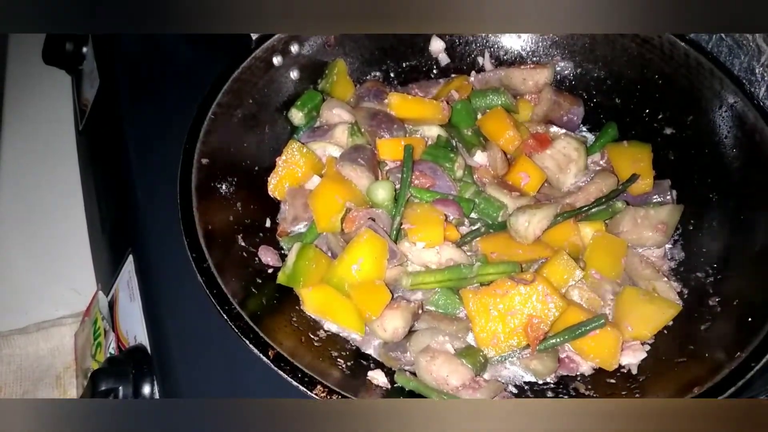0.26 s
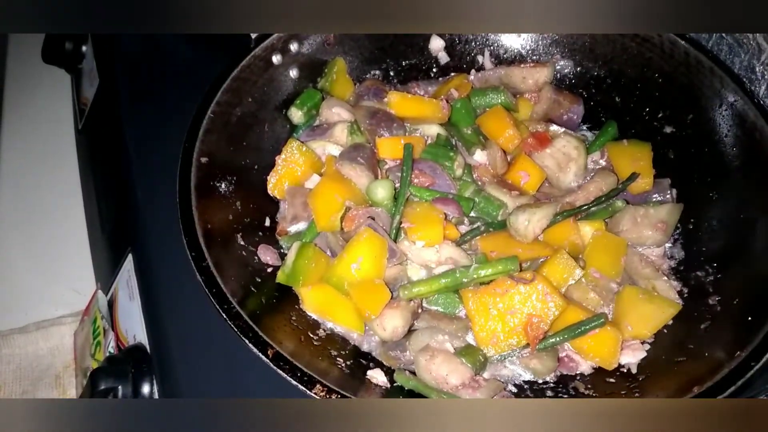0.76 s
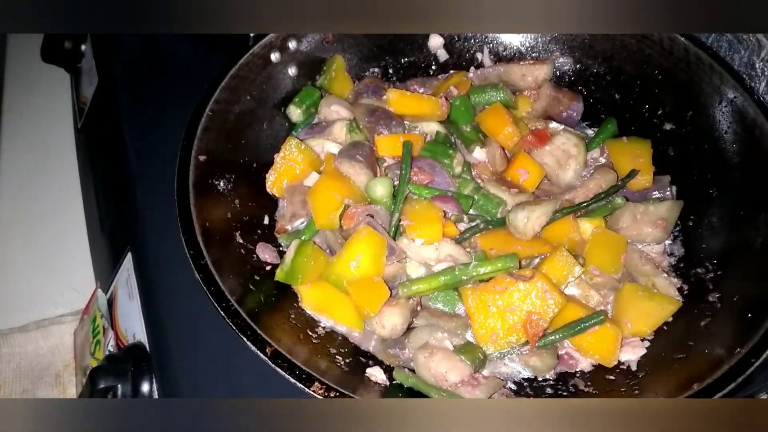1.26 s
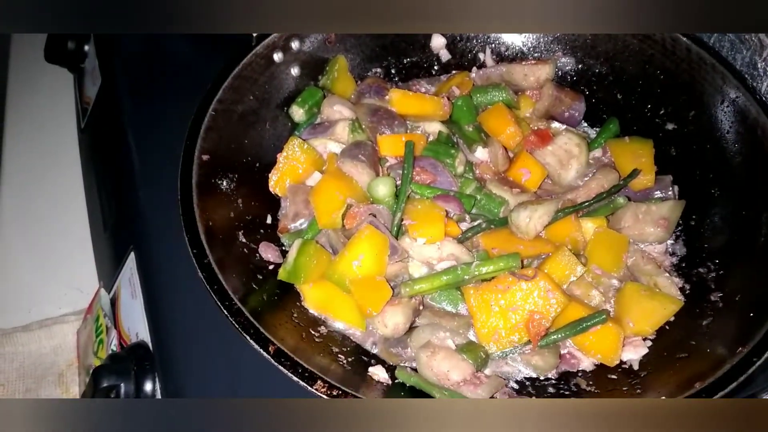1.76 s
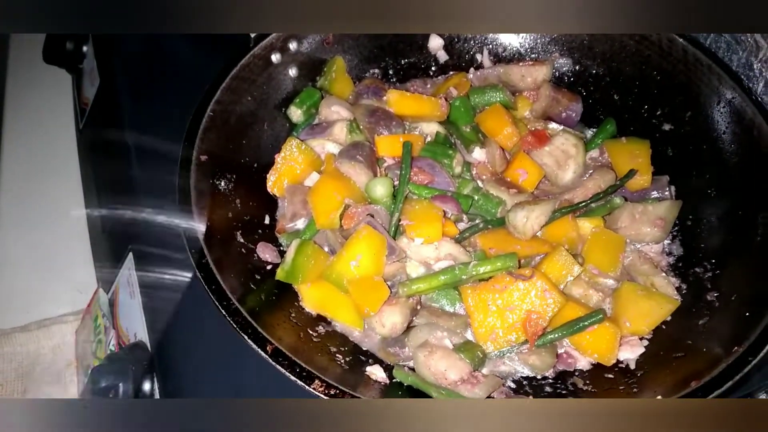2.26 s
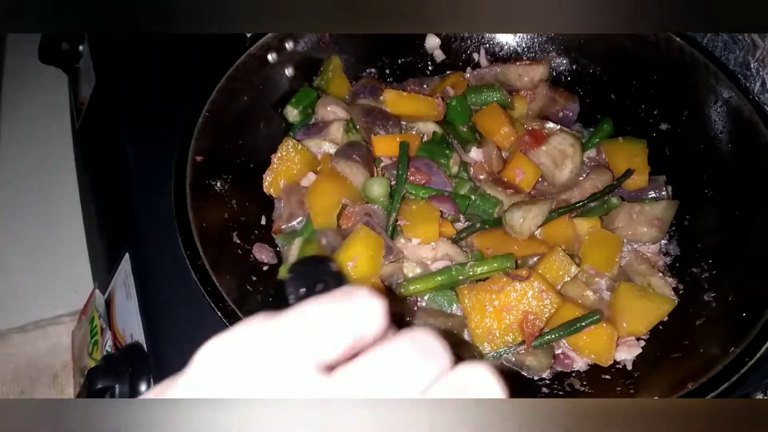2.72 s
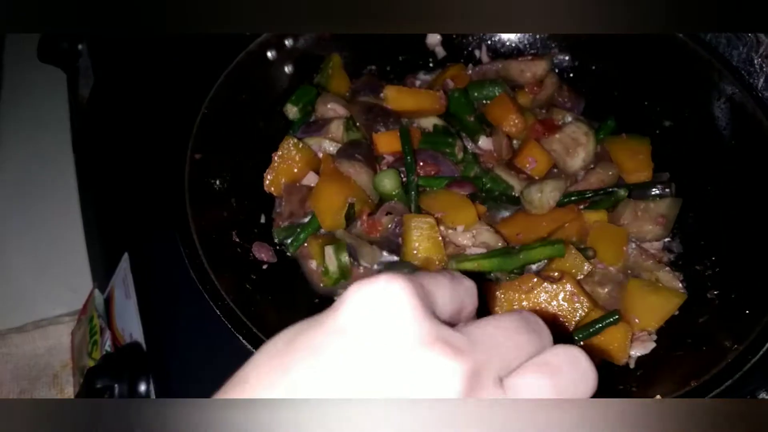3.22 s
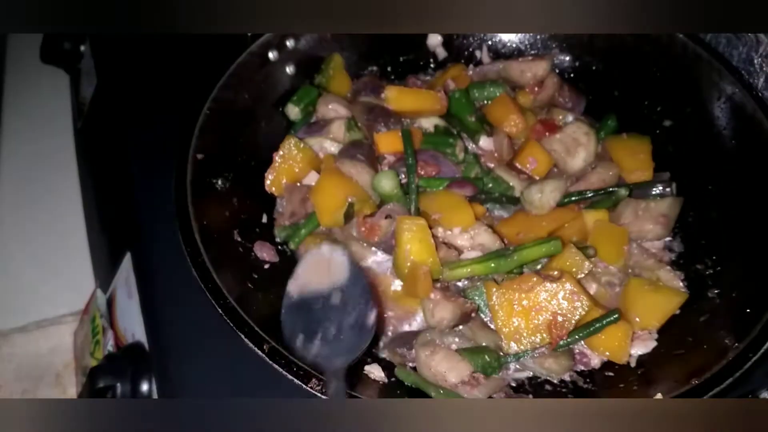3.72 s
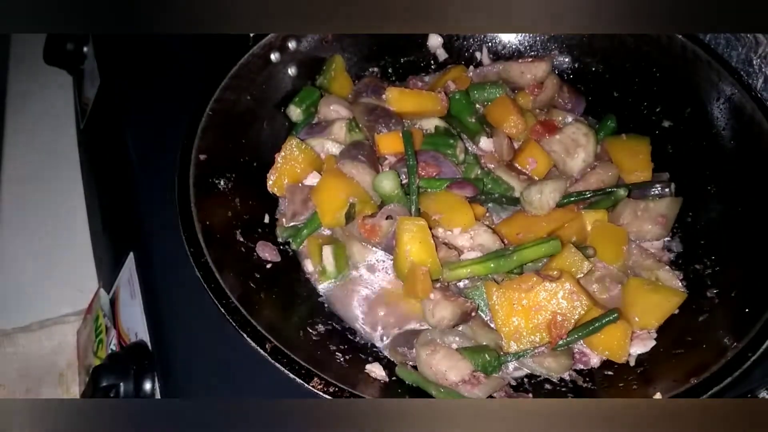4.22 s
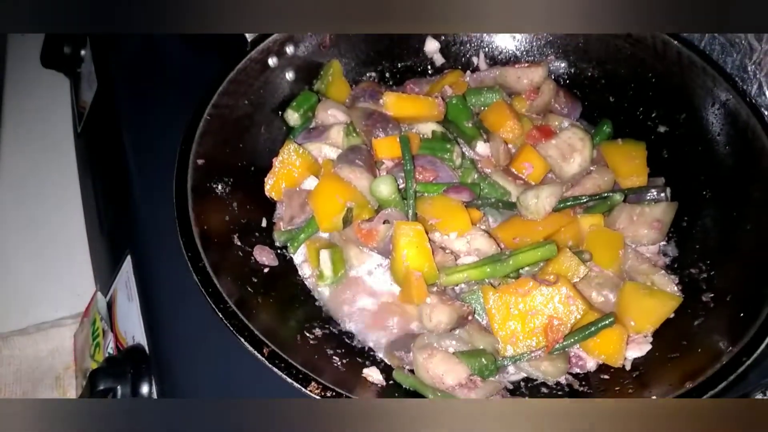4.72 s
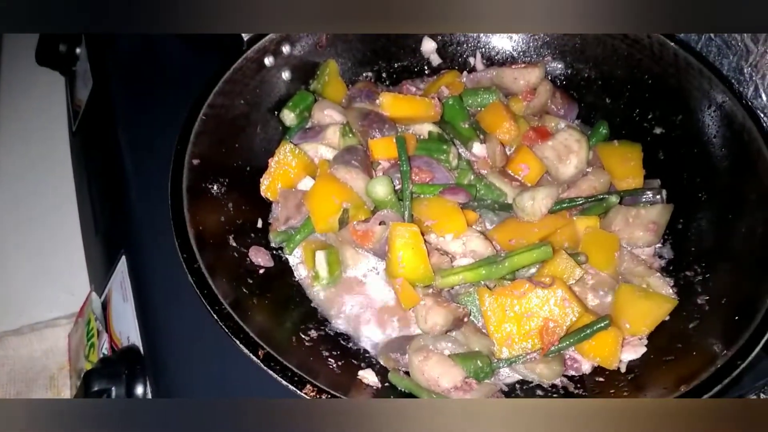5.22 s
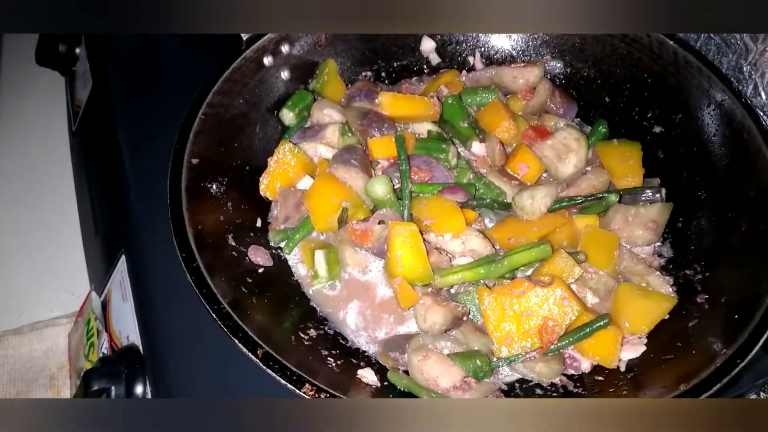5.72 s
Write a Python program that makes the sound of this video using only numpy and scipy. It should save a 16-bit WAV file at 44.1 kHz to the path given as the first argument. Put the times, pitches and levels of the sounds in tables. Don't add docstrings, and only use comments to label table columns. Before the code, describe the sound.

Vegetables fizz and sizzle steadily in a wok while a spoon clacks sharply once midway and smaller kitchenware knocks dot a small kitchen.

```python
import sys
import numpy as np
from scipy import signal
from scipy.fft import rfft, irfft, next_fast_len
from scipy.io import wavfile
from scipy.ndimage import uniform_filter1d

SR = 44100
rng = np.random.default_rng(int(sys.argv[2]) if len(sys.argv) > 2 else 0)


def attenuation_scalar(level_db):
    decades = np.asarray(level_db, float) / 20
    return 10 ** decades


def log_audio(samples):
    frames = np.atleast_2d(samples).T
    limited = np.clip(frames, -1, 1)
    pcm = np.round(limited * 32767).astype(np.int16)
    wavfile.write(sys.argv[1], SR, pcm)


N = 263625

# (time [s], level [dB])
BOIL = [(0.0, -54), (0.46, -54.5), (0.68, -52), (0.83, -57.5), (1.05, -51.5), (1.2, -53.5), (2.21, -53.5),
        (2.66, -52), (2.86, -54.5), (3.38, -54.5), (4.0, -54), (4.32, -53.5), (4.93, -53.5), (5.31, -49.5),
        (5.52, -54), (5.8, -52.5), (5.88, -50.5), (5.98, -54.5)]
# (time [s], peak [dB], left minus right [dB], pitch [Hz])
SPITS = [(0.032, -37.5, 1, 6390), (0.0824, -34, 4, 10100), (1.017, -33, 0, 10800), (1.077, -36, -3, 11500),
         (1.4355, -38, -7, 7720), (1.501, -33, -1, 9630), (1.715, -33, -1, 6660),
         (2.0157, -36.5, -5, 11100), (2.108, -33, -6.5, 9430), (2.212, -35, 5, 9590),
         (2.217, -27.5, 0, 9550), (2.2319, -33, -1, 10600), (2.2512, -37, -5, 10900),
         (2.373, -34, -4, 10600), (2.5284, -40, 3, 10300), (2.6975, -34, -4, 10300),
         (2.7206, -35, -5.5, 10200), (3.0085, -39, 1, 7590), (3.1265, -31.5, 1, 10900),
         (3.4796, -38, -4, 10700), (3.6754, -38, 0, 6610), (3.7314, -39, 4, 7050),
         (4.1159, -35.5, -1, 7530), (4.6432, -34, -5, 7390), (4.8518, -31, -2, 7800),
         (4.954, -32, -3, 6870), (5.1497, -39, 1, 6660), (5.172, -37, 3, 7070), (5.222, -37, 0, 11000),
         (5.255, -34, -4, 6760), (.144, -35, -1, 10800), (.549, -33, 0, 11000), (.62, -40, 0, 10100),
         (1.3912, -38, -1, 6960), (1.668, -39, 0, 6930), (1.787, -32, -4, 10500), (2.2972, -39, -3, 7230),
         (2.642, -39.5, -4, 10300), (2.6854, -41, -4, 11500), (2.7657, -37, 0, 10700),
         (2.8485, -41, -2, 11070), (3.1333, -37.5, -2, 7280), (3.2585, -38, 0, 10500),
         (3.3378, -38, 0, 10540), (4.0056, -37, -1, 7160), (4.368, -38, -2, 10000), (4.998, -38, -1, 7420),
         (5.074, -35, 0, 7740), (5.1966, -36, 0, 10800), (5.4116, -40, 0, 6760)]
# (time [s], level [dB], left minus right [dB], contact [ms], rattle T60 [ms])
KNOCKS = [(0.47, -46.5, 1, 60, 99), (0.6495, -30, 2, 3.7, 125), (0.7363, -46, 3, .8, 40),
          (0.7765, -36, 2, 4.2, 140), (1.865, -48, 2, 21, 95), (2.4508, -30, -1, 3, 36),
          (2.4549, -18, 1.5, 1.5, 22), (2.4604, -32.5, -2, 3.4, 50), (2.7791, -38, 3, 0.93, 120),
          (3.611, -31, 0, 4.8, 35), (4.5516, -42, 3, 1.5, 110), (5.1745, -45.5, 3, 2, 36),
          (5.405, -45, 1.5, 8.9, 83), (5.7196, -40, 1.5, 2.8, 49), (5.7652, -34.5, 7.5, .4, 16),
          (2.4559, -15, -9, 0.66, 7.6), (2.218, -42.5, 1, 0.82, 13), (5.42, -49, 0, 3, 56),
          (5.865, -51.5, 2, 4, 90), (4.56, -54, 1, 9, 120), (2.465, -46, 0, 4.2, 220),
          (2.8, -50.5, 2, 50, 90), (.549, -45, 0, 1, 60)]
# (time [s], frequency [Hz], level [dB], T60 [s], left minus right [dB])
METAL_RINGS = [(2.4548, 2880, -36.5, 0.14, 11), (2.4553, 4500, -48, 0.06, 7), (2.4553, 5930, -44, 0.17, 4),
               (2.4553, 4600, -48, .2, 4), (2.4553, 4600, -46, .15, 4), (2.4553, 7410, -53, .16, 7),
               (2.456, 9470, -44, .06, 0), (2.456, 8880, -50, .1, 0), (2.456, 14780, -56, .25, -5),
               (2.683, 13000, -52, .12, -5), (2.4553, 4200, -44, .09, 3), (2.4548, 7520, -50, 0.1, 7),
               (2.456, 10330, -41, 0.089, 0), (2.456, 13750, -54, .45, -5), (.778, 7450, -49.5, 0.12, 7),
               (.778, 10330, -50, .17, -3), (.778, 13700, -54, .15, -4), (0.777, 1620, -42.5, 0.11, 5),
               (3.613, 7200, -55, 0.055, -2),
               (.651, 945, -45, .08, 2), (.651, 1454, -46, .13, 2), (.651, 1710, -45, .11, 2),
              (.651, 2440, -50, .11, 2), (.651, 2830, -47, .09, 2), (.651, 3630, -44, .1, 2),
              (.651, 4300, -47, .08, 2), (.651, 6090, -51, .1, 2), (.778, 890, -49, .09, 4),
              (.778, 2170, -49, .11, 2), (0.779, 2524, -50, .14, 2), (.778, 2770, -49, 0.15, 2),
              (.778, 3200, -51, 0.098, 2), (.778, 4190, -48, 0.099, 2), (3.612, 1008, -47.5, 0.14, 0),
              (3.612, 1600, -44, .04, 0), (3.613, 2490, -48, .04, 0), (3.613, 3600, -45.5, .14, 2),
              (3.614, 5840, -49, 0.13, 0), (3.614, 8100, -52, .09, 0)]
# (time [s], firing rate [Hz], level [dB])
ENGINE = [
    (0, 48.7, -60),
    (.46, 45.97, -59),
    (.92, 39.1, -60),
    (1.2, 37.44, -60),
    (1.8, 35, -64),
    (2.5, 33.55, -65),
    (3.1, 36.6, -73),
    (3.7, 36.5, -64),
    (4.3, 35, -76),
    (5.98, 31, -67),
]
# (frequency [Hz], gain [dB])
FIZZ = [(1500, -28), (3000, -6.5), (5000, -4.5), (8000, -4), (11000, -0.5), (14000, 0), (17000, 0)]
# (frequency [Hz], gain [dB])
RUSH = [(600, -14.5), (1500, 0.5), (3000, -2.5), (6000, -8), (12000, -16.5), (17000, -9.5)]
# (frequency [Hz], gain [dB])
BRIGHT = [(1000, -14), (2500, -12), (4000, 0), (5500, 3), (8000, -0.5), (12000, -4.5), (17000, 7.5)]
# (frequency [Hz], gain [dB])
DULL = [(250, -20), (650, 1.5), (1500, 1.5), (2500, -1.5), (4000, -8), (8000, -42)]
# (frequency [Hz], density [dB per Hz])
HOOD = [(30, -9), (70, -1.5), (130, 0), (200, -0.5), (280, -5.5), (420, -5.5), (760, -4.5), (1100, -9),
        (1700, -11), (2500, -22), (3500, -49)]
# (resonance [Hz], width [Hz], gain [dB])
PORTS = [
    (7380, 1170, 0.5),
    (10800, 1950, 0),
]
# (frequency [Hz], density [dB per Hz])
JAR = [(350, -41), (600, -16), (950, -7), (1200, -11), (1620, -2.5), (1910, -10), (2040, -27), (2370, -2),
       (2680, -11.5), (3660, -2), (4620, -11), (5980, -3.5), (9370, -3), (10700, 0), (15500, -13.5)]
# (frequency [Hz], density [dB per Hz])
BOWL = [(350, -38), (600, -10), (902, -10), (1030, -16), (1620, -1.5), (2000, -10), (2570, -7.5),
        (3200, -5), (3470, -29), (4090, -5.5), (5220, -11), (7240, -3.5), (9240, -8), (10700, -0.5),
        (15500, -22)]
# (frequency [Hz], density [dB per Hz])
SPOON_BLOW = [(900, -27.5), (1100, -21), (1850, -21.5), (2050, -10.5), (2500, -12.5), (3300, -12.5),
              (4400, -12), (5200, 2), (6000, -4), (6800, 1), (7700, -0.5), (9300, -7.5), (10600, -4),
              (13000, -14), (16000, -17.5)]
# (frequency [Hz], density [dB per Hz])
WOK = [(410, -77), (700, -53), (980, -5), (1410, -7), (2630, -9.5), (2990, -33), (3580, -3), (3920, -8),
       (4520, -2), (5430, -11), (5860, 1.5), (8880, -9.5), (10600, 0), (15500, -20)]
# (frequency [Hz], density [dB per Hz])
RIM = [(1180, -56), (2000, -27), (4320, -18.5), (5180, -24), (6640, -1.5), (8510, -20), (11200, -14),
       (15500, -30.5)]
# (frequency [Hz], density [dB per Hz])
TIP = [(880, -47), (1500, -22), (1790, -36), (2860, -22), (7230, -4), (9420, -25), (11100, -17),
       (15500, -21.5)]
# (frequency [Hz], density [dB per Hz])
HANDLE = [(700, -30), (1500, -2.5), (3000, -2), (5000, -4), (8000, -12), (15500, -25)]
# (frequency [Hz], density [dB per Hz])
SPOON_TAIL = [(3300, -40), (4100, -22), (4600, -2), (6000, -4), (7500, -2), (10300, -4), (14000, -12),
              (15500, -25)]
# (frequency [Hz], density [dB per Hz])
SCRAPE = [(700, -24), (1200, -12), (2500, -24), (5000, -16), (7400, 0.5), (9000, -10), (10300, -3),
          (15500, -14)]
# (frequency [Hz], density [dB per Hz])
THUD = [(250, -22), (500, 0), (700, 0), (1100, -5), (1800, -4), (2600, -25), (15500, -50)]
BODIES = {2.465: SPOON_TAIL, 2.8: SCRAPE, 2.7791: SCRAPE, .7363: RIM, 4.56: THUD, 5.42: THUD, 5.865: THUD,
          .6508: JAR, .7775: BOWL, 2.4553: SPOON_BLOW, 3.6115: WOK, 5.1745: HANDLE, 5.7205: RIM, 5.7652:
          TIP}

USUAL_BOIL_DB = -51.5


def level(x, db):
    return x * attenuation_scalar(db) / np.sqrt(np.mean(x ** 2))


def colour(x, points):
    hz, db = np.transpose(points)
    size = next_fast_len(x.shape[-1])
    f = np.maximum(np.fft.rfftfreq(size, 1 / SR), 1)
    gain = attenuation_scalar(np.interp(np.log(f), np.log(hz), db))
    return irfft(rfft(x, size) * gain, size)[..., :x.shape[-1]]


def walk(rate_hz):
    k = int(SR / rate_hz)
    held = np.repeat(rng.standard_normal(N // k + 1), k)
    return 1.63 * uniform_filter1d(uniform_filter1d(held, k), k)[:N]


def add(out, s, x):
    i = int(s * SR)
    out[:, i:i + x.shape[1]] += x[:, :N - i]


def sides(pan_db):
    return attenuation_scalar(np.array([pan_db, -pan_db]) / 2)


def fizz(rate_hz, spread_db, cap_db, pan_db, cycles, patchy_db, blur):
    draws = rng.random((int(9000 * N / SR), 6))[:int(rate_hz * N / SR)]
    when, size, place, pitch, left, right = draws.T[..., None]
    step = np.arange(100)
    at = (when * (N - 180)).astype(int) + 40
    turns = 2000 * 9 ** pitch ** .6 * step / SR
    swell = np.exp(-turns / cycles) - np.exp(-4 * turns / cycles)
    swing = swell * np.sin(2 * np.pi * turns)
    size_db = np.minimum(-spread_db * np.log(size), cap_db) + patchy_db * walk(25.09)[at]
    out = []
    for side, shade in ((0.98, left), (-1, right)):
        lag = (side * 40 * (place - .5)).astype(int)
        gain = attenuation_scalar(size_db + side * pan_db * (place - .5) + 5.2 * shade)
        out.append(np.bincount((at + lag + step).ravel(), (gain * swing).ravel(), minlength=N))
    near = level(colour(np.array(out), FIZZ), 0)
    hiss = level(colour(rng.standard_normal((2, N)), FIZZ), 0) * attenuation_scalar(patchy_db * walk(23.22))
    blur = np.clip(blur, 0, 1)[:, None]
    return np.sqrt(1 - blur) * near + np.sqrt(blur) * hiss


def boiling(bubbles, boil_db):
    surge_db, wander_db = 0.7, 2.5
    return bubbles * attenuation_scalar(boil_db - 57.5 + surge_db * walk(9)) * sides(wander_db * walk(9))


def steam_rush(boil_db):
    rush_db, db_per_boil_db = -57.5, 0.64
    rush = level(colour(rng.standard_normal((2, N)), RUSH), rush_db)
    sway_db = 1.63 * np.array([walk(30), walk(30)])
    return rush * attenuation_scalar(db_per_boil_db * boil_db + sway_db)


def spits():
    out, t = np.zeros((2, N)), np.arange(1024) / SR
    rise_s, spit_ms = 0.0009, 4.7
    fade = np.exp(-t * 2300 / spit_ms) * (1 - np.exp(-t / rise_s))
    for s, db, pan_db, hz in SPITS:
        band = [(hz / 4, -40), (0.58 * hz, -13), (hz, 0), (1.7 * hz, -13), (2 * hz, -28)]
        wave = level(colour(rng.standard_normal((2, len(t))), band), db - 11.5)
        add(out, s, sides(1.8 * pan_db)[:, None] * fade * wave)
    return out


def knocks():
    out, lead_s, t = np.zeros((2, N)), .005, np.arange(8192) / SR
    dull_db, dull_db_per_ms = -25, 0.28
    port = np.sqrt(np.mean(abs(ports(np.fft.rfftfreq(len(t), 1 / SR))) ** 2, axis=0))
    ms = np.maximum(t - lead_s, 0) * 1000
    for s, db, pan_db, contact_ms, t60_ms in KNOCKS:
        high, low, grain = rng.standard_normal((3, 2, len(t)))
        fade = np.minimum(ms / contact_ms, 1) * attenuation_scalar(-60 * np.maximum(ms - contact_ms, 0) / t60_ms)
        fade = fade * attenuation_scalar(2.6 * level(uniform_filter1d(grain, 40), 0))
        bright = level(colour(high, BRIGHT), 0)
        dull = level(colour(low, DULL), dull_db + dull_db_per_ms * t60_ms)
        wave = fade * (bright + dull)
        for body_s, body in BODIES.items():
            if abs(body_s - s) < .003:
                blow = rfft(fade * high)
                blow = blow / np.sqrt(uniform_filter1d(abs(blow) ** 2, size=60))
                wave = colour(irfft(blow / port), body)
        add(out, s - lead_s, sides(pan_db)[:, None] * level(wave, db) * np.sqrt(np.mean(fade ** 2)))
    return out


def metal_rings():
    out, t = np.zeros((2, N)), np.arange(8192) / SR
    for s, hz, db, t60_s, pan_db in METAL_RINGS:
        start, apart = rng.random(2)
        turns = hz * t + start + np.array([[0], [.5 * apart - .25]])
        add(out, s, attenuation_scalar(db - 60 * t / t60_s) * sides(pan_db)[:, None] * np.sin(2 * np.pi * turns))
    return out


def kitchen(x):
    room_t60_s, room_db, rise_s = 0.21, -8, 0.0012
    t = np.arange(int(.5 * SR)) / SR
    tail = rng.standard_normal((2, len(t))) * attenuation_scalar(-60 * t / room_t60_s) * np.minimum(t / rise_s, 1)
    tail = colour(tail, [(500, 11.5), (3000, -4.0), (9000, -4.5), (17000, -12.0)])
    tail = tail / np.sqrt(np.sum(tail ** 2) / 2)
    return attenuation_scalar(room_db) * signal.fftconvolve(x, tail, axes=1)[:, :N]


def hood(boil_db):
    air_db, air_sway_db, air_db_per_boil_db = -58, .6, 0.35
    rumble_db, rumble_fade_db_per_s, rumble_sway_db = -63, .5, 1.5
    hum_hz, hum_db, hum_sway_db, hum_start_s, hum_rise_s = 120.2, -66.5, 1.5, 1.7, .4
    t = np.arange(N) / SR
    mid, side = colour(rng.standard_normal((2, N)), HOOD)
    side = colour(side, [(120, -59), (250, -11.0), (600, -4.5), (1300, 0)])
    air = level(np.array([mid + side, mid - side]) * sides(0.34)[:, None], 3.87)
    wobble_rad = 1.04 * walk(8.7)
    shake = rng.standard_normal(N) + 0.068 * np.outer([1, -1], rng.standard_normal(N))
    rumble = level(colour(shake, [(12, -26), (22, -0.5), (40, 2.5), (70, 0.5), (100, -32.5)]), rumble_db)
    rumble = rumble * attenuation_scalar(rumble_sway_db * walk(5.26) - rumble_fade_db_per_s * t)
    hum = attenuation_scalar(hum_db + hum_sway_db * walk(6)) * np.sin(2 * np.pi * hum_hz * t + wobble_rad)
    hum = hum * np.clip((t - hum_start_s) / hum_rise_s, 0, 1)
    air = air * attenuation_scalar(air_db + air_db_per_boil_db * boil_db + air_sway_db * walk(7))
    return air + hum + rumble


def engine():
    s, hz, db = np.transpose(ENGINE)
    t = np.arange(N) / SR
    firing_hz = np.interp(t, s, hz) * (1 + 0.011 * walk(6))
    phase = 2 * np.pi * np.cumsum(firing_hz) / SR
    first = attenuation_scalar(1.5 * walk(5.3)) * np.sin(phase)
    second = attenuation_scalar(-5 + 1.4 * walk(3)) * np.sin(2 * phase)
    return attenuation_scalar(np.interp(t, s, db)) * (first + second)


def ports(f):
    hz, width_hz, db = np.transpose(PORTS)[:, :, None]
    return attenuation_scalar(db) / (1 - (f / hz) ** 2 + 1j * f * width_hz / hz ** 2)


def scene():
    boil_db = np.interp(np.arange(N) / SR, *np.transpose(BOIL)) - USUAL_BOIL_DB
    bubbles = fizz(rate_hz=6000, spread_db=4.5, cap_db=14.5, pan_db=15.0, cycles=3.1,
                   patchy_db=1.34, blur=[.4, .18])
    rush = steam_rush(boil_db)
    hits = knocks() + metal_rings() + spits()
    bubbles = boiling(bubbles, boil_db)
    return bubbles + rush + hits + kitchen(hits) + hood(boil_db) + engine()


def band_limit(x):
    return signal.sosfilt(signal.butter(12, 16810, fs=SR, output="sos"), x)


def record(dry):
    capsule_db, top_hz = -64, 15800
    size = next_fast_len(N + 2000)
    f = np.fft.rfftfreq(size, 1 / SR)
    hiss = attenuation_scalar(capsule_db) * rng.standard_normal(dry.shape)
    spectrum = rfft(dry, size) * ports(f) + rfft(hiss, size)
    heard = irfft(spectrum * (f < top_hz), size)[:, :N]
    return band_limit(heard)


dry = scene()
out = record(dry)
log_audio(out)
```